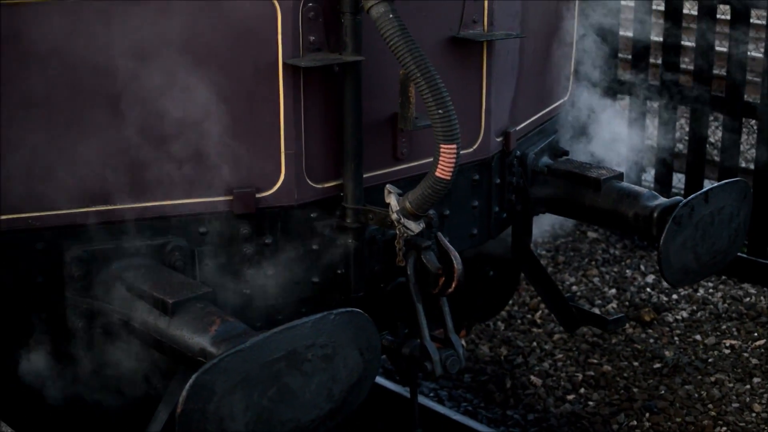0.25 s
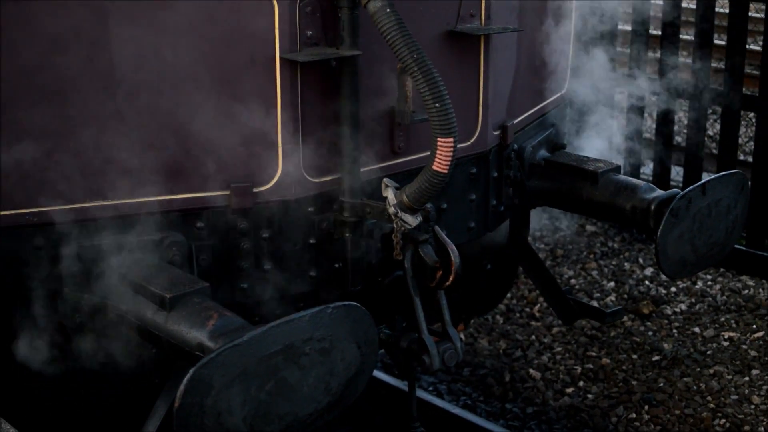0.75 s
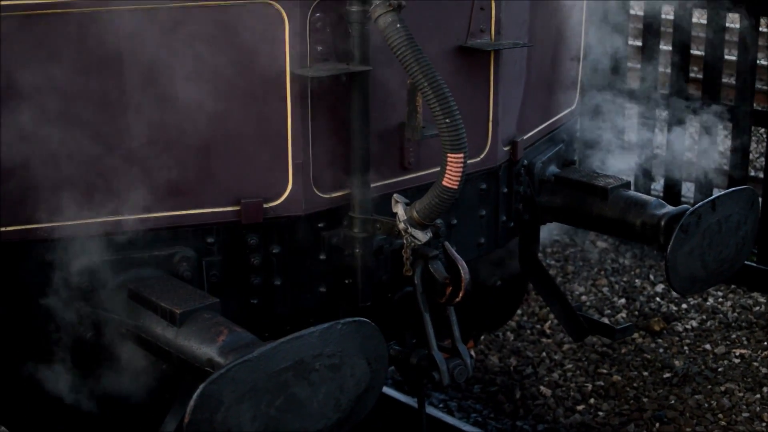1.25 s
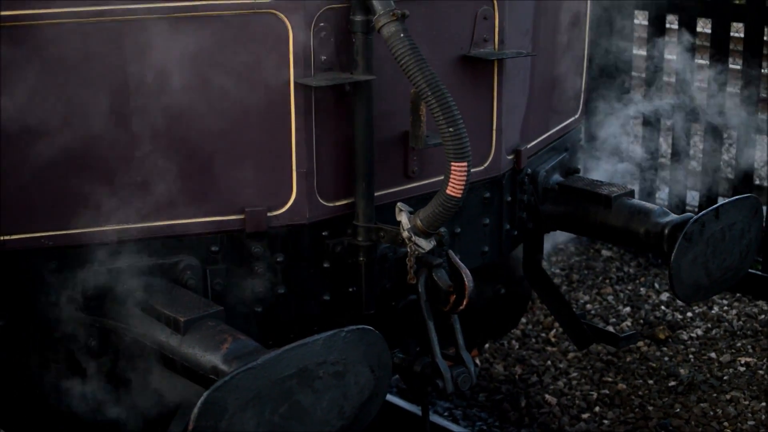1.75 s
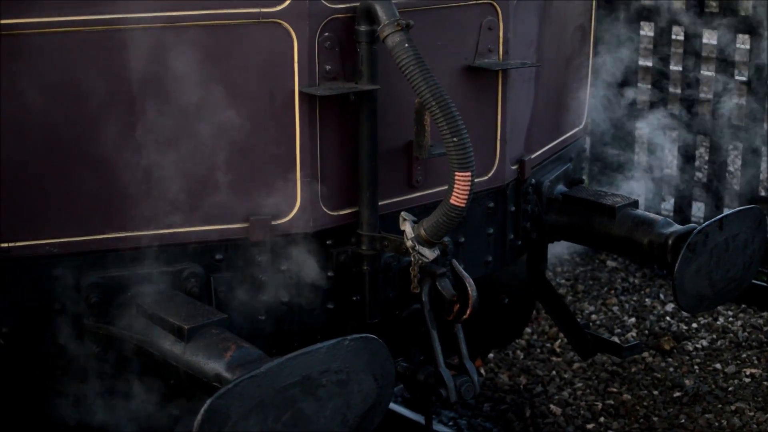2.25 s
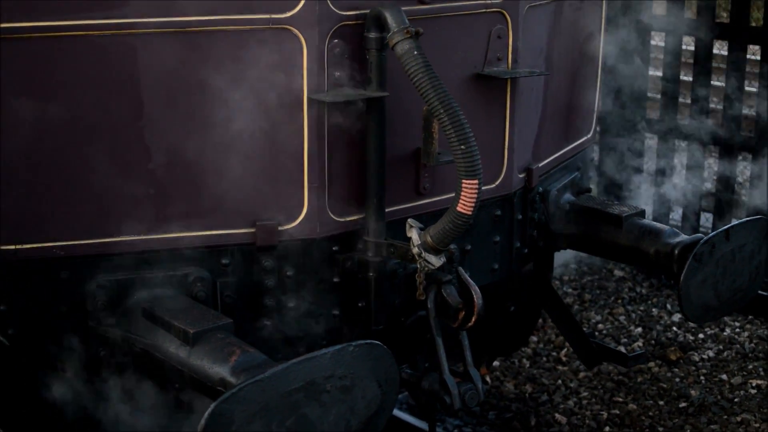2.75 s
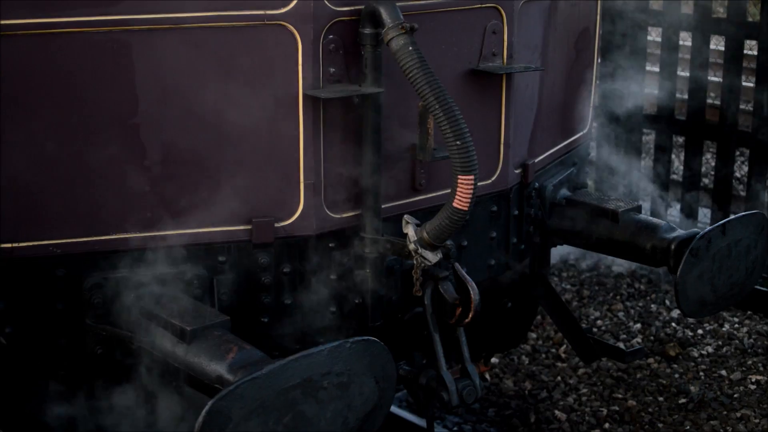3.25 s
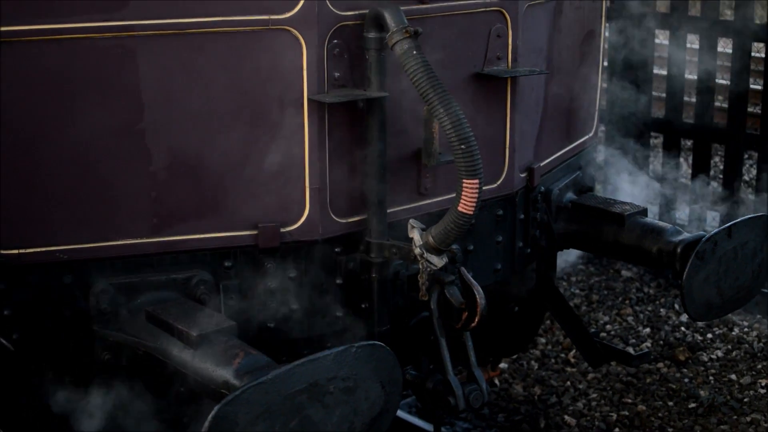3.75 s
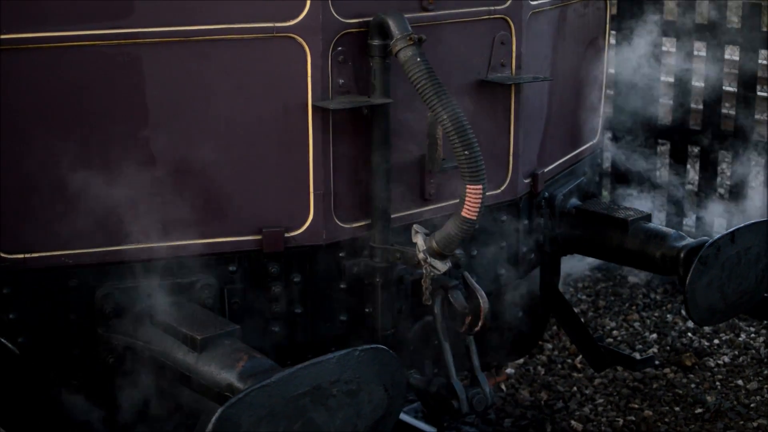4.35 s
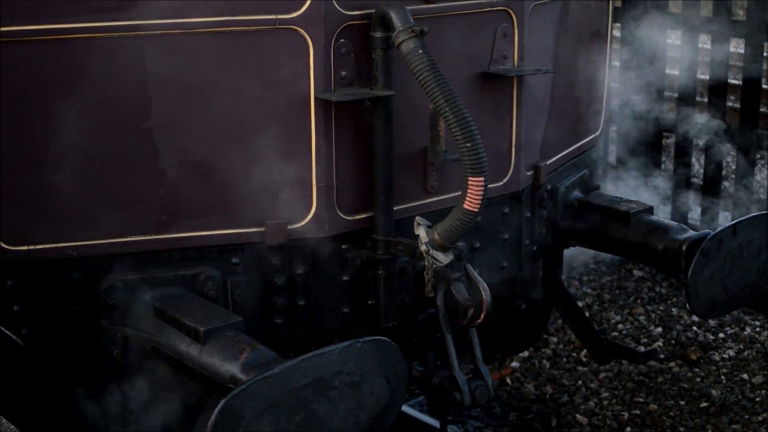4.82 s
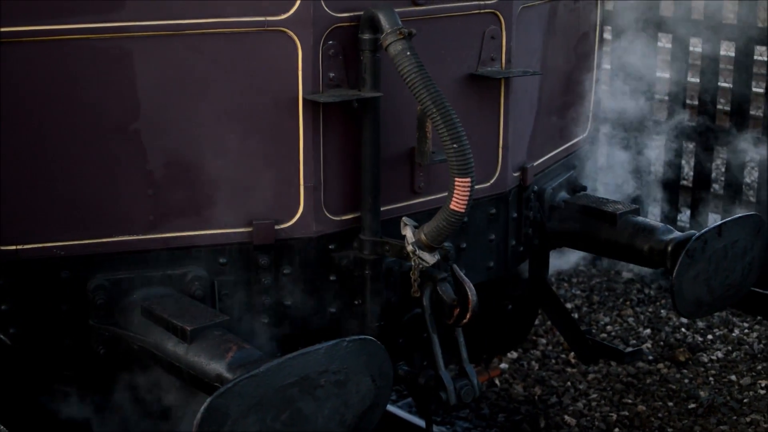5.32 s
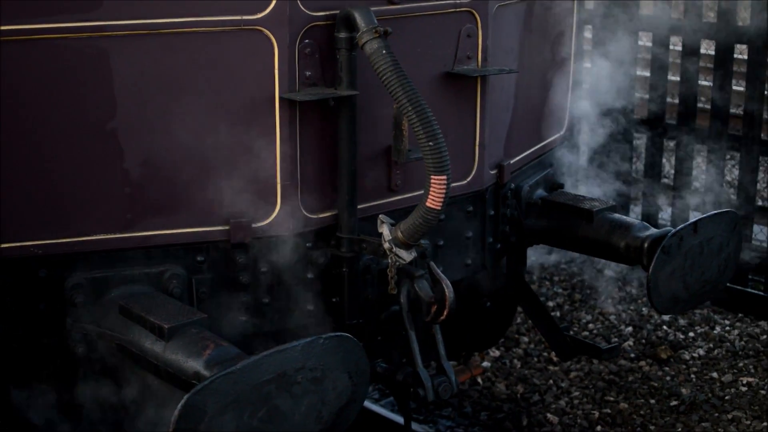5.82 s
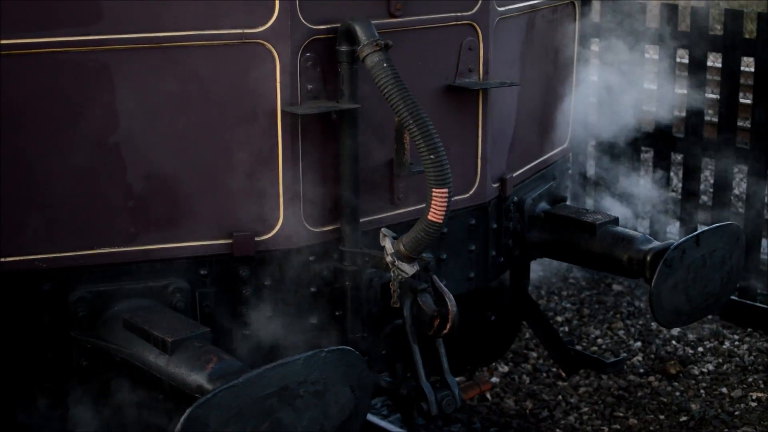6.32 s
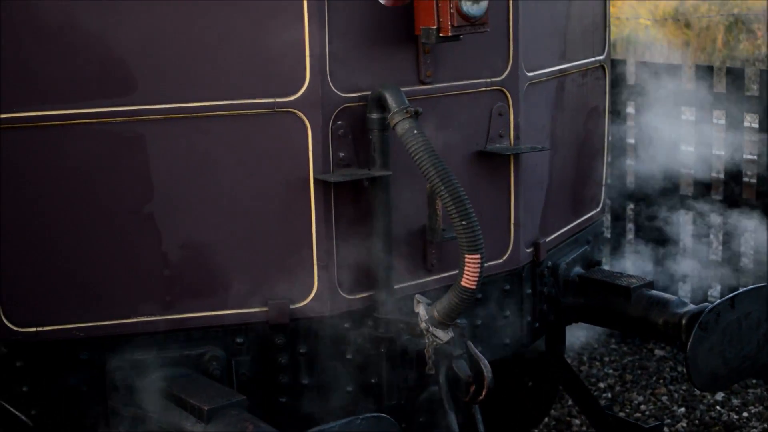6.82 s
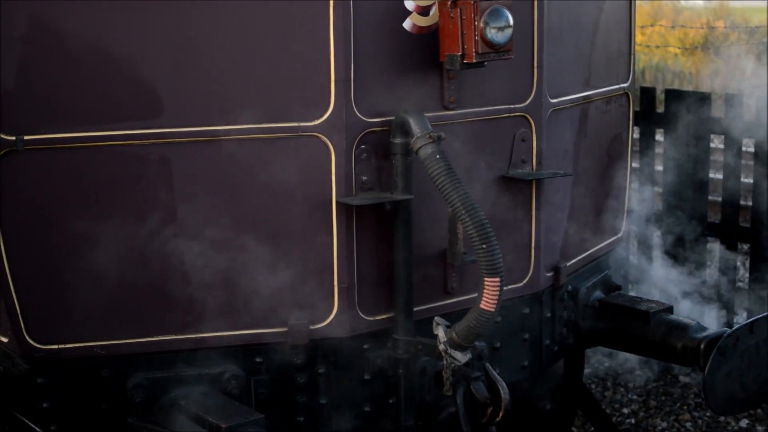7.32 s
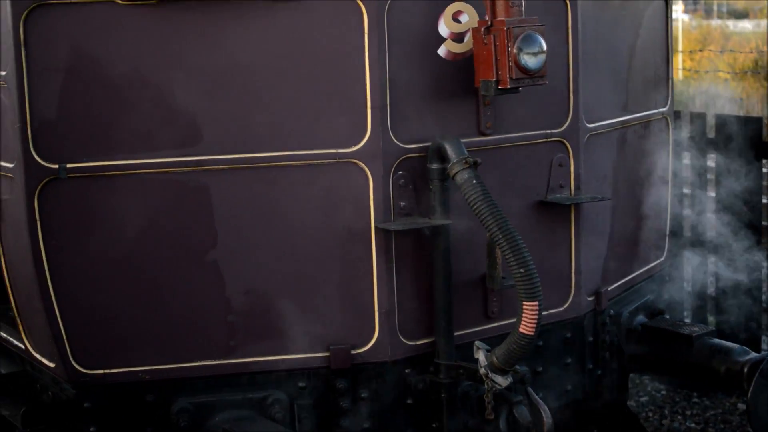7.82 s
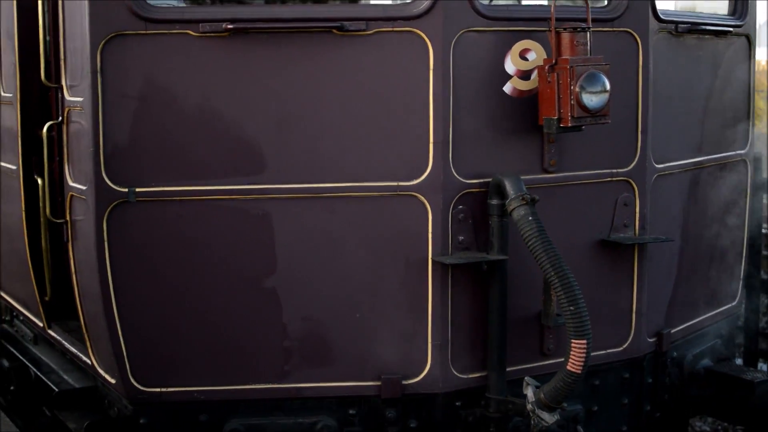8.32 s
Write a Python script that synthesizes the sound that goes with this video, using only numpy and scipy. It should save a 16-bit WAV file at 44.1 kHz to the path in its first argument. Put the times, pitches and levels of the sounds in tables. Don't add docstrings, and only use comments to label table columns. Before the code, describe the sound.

Outdoors, very close to a standing steam locomotive. From 0 s dense bright hiss pours from leaking joints over a low firebox rumble and a drone near 40 and 80 Hz that throbs once a second. Until 0.8 s wet steam spits in short bursts, strongest around 0.4-0.55, with a hollow pipe moan near 770 Hz. Then steady, slightly drifting hiss, with faint dull knocks near 2 and 3.2 s. At 3.45 a whistle stutters breathily, locks at about 3.64 into a strong tone rising from 750 to 800 Hz with a rush of steam, and stops at 4.05. The microphone overloads and its gain sinks; a beating ring near 790 Hz decays, with dull distant echoes around 5-5.7. The hiss recovers by about 4.6 and continues. Faint knocks come at 6.1-6.4; at 7.03 a strong puff, thump and small bright link clink. The rumble eases after 7.4, hiss lasting to 8.57.

```python
import sys
import numpy as np
from scipy import signal
from scipy.fft import rfft, dct
from scipy.io import wavfile
from scipy.ndimage import uniform_filter1d

SR = 44100
rng = np.random.default_rng(int(sys.argv[2]) if len(sys.argv) > 2 else 0)


def voltage_ratio(level):
    return 10 ** (np.asarray(level, float) / 20)


def file_out(sig):
    cols = np.atleast_2d(sig).T
    lim = np.clip(cols, -1, 1)
    pcm = np.round(lim * 32767).astype(np.int16)
    wavfile.write(sys.argv[1], SR, pcm)


N = 377937

# frequency in Hz, density in dB per Hz.
FIZZ_SPECTRUM = [(1470, -31.0), (2500, -12.0), (2870, -44), (2980, -7.0), (3420, -5.5), (3690, -1.5),
                 (4540, -5.0), (5890, -2.5), (7410, -4.0), (9620, -0.5), (11900, -6.5), (15600, -17),
                 (16500, -22)]
# frequency in Hz, density in dB per Hz.
BODY_SPECTRUM = [(260, -12), (450, -13.5), (659, -8), (759, -2.5), (1090, -7), (1550, 2), (1680, -1),
                 (2900, -6), (3770, -50), (6380, -120)]
# frequency in Hz, density in dB per Hz.
RUMBLE_SPECTRUM = [(18, -30), (30, -11.5), (59, 3.5), (81, 0), (92, -22), (108, -3), (173, -2.5),
                   (235, 1.5), (286, 8.5), (325, 0.5), (350, -8), (451, -3), (520, -11.5), (680, -13),
                   (1140, -120)]
# frequency in Hz, width in Hz, lift in dB.
PIPE_MODES = [(797, 20, 2.5), (1562, 295, -9.5), (2308, 43, 8.5), (2920, 91, -4.5), (3035, 63, 1.5),
              (3354, 320, -2.5), (3716, 110, -1), (4356, 87, 0.5), (4800, 75, 0.5), (5143, 150, 0),
              (6016, 100, 4), (6910, 250, -5)]
# frequency in Hz, width in Hz, level in dB over the rumble, fuzz share, throb share.
DRONE = [
    (39.6, 5.1, -7, 0.44, 1),
    (80.7, 1.7, -7.5, 0.34, 0.12),
]
# time in seconds, level in dB, brightness in dB per octave.
LEAK_DRIFT = [(0, -1, 3), (.8, 0.5, 1), (1.1, -0.1, 0.5), (1.7, 0, -0.5), (2.3, -0.6, -1.5),
              (2.85, 0.5, -1.5), (3.2, -0.4, 0.5), (4.4, 2, -1), (4.75, -0.9, -1.5), (5.2, -0.8, -1.5),
              (5.6, 0.3, -0.5), (6.2, .6, -1.9), (6.7, -1, 0), (7.3, 1, -1), (7.7, 0.5, 0.5), (8.1, 0.5, 0),
              (8.57, 0.4, 4.5)]
# start in seconds, flow in dB, hold in seconds.
LEAK_SURGES = [
    (0.637, 1, 0.046),
    (7.027, 6, 0.013),
]
# time in seconds, flow in dB over the leak.
VALVE_JET = [(3.44, -9), (3.468, -3), (3.48, 1.5), (3.495, 3), (3.51, 6), (3.536, 5.5), (3.555, 12.5),
             (3.572, 19.5), (3.596, 16), (3.62, 21), (3.642, 22), (3.652, 14.5), (3.7, 18.5), (3.8, 18),
             (3.9, 13), (4.03, 7.5), (4.1, -1)]
# frequency in Hz, density in dB per Hz.
JET_SPECTRUM = [(90, -12), (300, -14), (600, -3), (1500, -6), (2900, -0.5), (4000, -5), (6000, 0),
                (7800, -4.5), (9600, 2.5), (12000, -8), (16500, -18)]
# start in seconds, level in dB, hold in seconds, darkness from 0 to 1.
WET_SPITS = [(0, -19, 0.12, 0), (0.38, -15, .003, 0.01), (0.398, -15, 0.0066, 0),
             (0.427, -12.5, .004, 0.01), (0.458, -10.5, 0.086, 0), (0.563, -17, 0.063, 0.03),
             (0.647, -24, 0.032, 0), (0.688, -23, 0.0091, 0), (3.199, -25, .015, 0),
             (3.245, -21, 0.02, 0.1), (7.012, -20, .008, 0), (7.048, -28, 0.011, 0.4)]
# frequency in Hz, density in dB per Hz.
SPIT_SPECTRUM = [(250, -13), (560, -15.5), (700, -1.5), (1080, -8.5), (1200, -10), (1600, -9.5),
                 (1750, -15), (2780, -7), (2960, -2), (3100, -7), (3800, -12.5), (5000, -11), (7000, -21),
                 (10000, -7), (15600, -43)]
# frequency in Hz, density in dB per Hz.
THUD_SPECTRUM = [(30, 12), (120, -16), (220, 19), (400, 12), (900, -58), (3000, -60)]
# frequency in Hz, width in Hz, lift in dB.
COCK_MODES = [(760, 65, -9), (1030, 110, 10), (1440, 80, 12), (1580, 60, 0), (2100, 90, 3), (3040, 80, 1),
              (3330, 180, 9), (3700, 160, 2), (4330, 120, -2)]
# start in seconds, pitch in Hz, level in dB, 60 dB decay in seconds.
FRAME_KNOCKS = [(1.81, 198, -26, .25), (2.06, 126.5, -29.5, .25), (3.22, 253.5, -35, 0.22),
                (3.24, 356, -30.5, 0.3), (6.111, 362, -29, 0.21), (6.35, 221, -22.5, 0.28),
                (6.35, 145, -24, .2), (7.05, 107, -17, 0.087), (7.05, 394, -25, .12),
                (7.42, 328, -31.5, 0.22)]
# time in seconds, pitch in Hz, level in dB.
PIPE_MOAN = [(0, 790, -22), (.12, 770, -25), (.2, 790, -31), (.36, 778, -24.5), (.385, 760, -21),
             (.42, 770, -35), (.55, 765, -28), (.68, 757, -20), (.79, 750, -33)]
# time in seconds, pitch in Hz, level in dB.
WHISTLE_STUTTER = [(3.45, 741, -14), (3.484, 730, -24), (3.51, 816, -15), (3.556, 803, -5.5),
                   (3.566, 790, -4), (3.577, 795, 6), (3.588, 797, -4), (3.598, 777, 6), (3.608, 774, -17),
                   (3.622, 790, 5), (3.63, 760, -7)]
# time in seconds, level in dB.
WHISTLE_LOCKED = [(3.642, 16), (3.654, 13.5), (3.668, 10.5), (3.69, 17), (3.748, 15), (3.797, 18.5),
                  (3.861, 20.5), (3.93, 21.5), (3.962, 19.5), (3.995, 22), (4.015, 19), (4.04, 14.5),
                  (4.058, 4), (4.066, 9), (4.074, -1), (4.087, -27)]
# time in seconds, pitch in Hz, third partial in dB, second partial in dB.
WHISTLE_PRESSURE = [(3.575, 719, -28, -34), (3.587, 729, 5, -32), (3.603, 747, 8.5, -29),
                    (3.625, 760, 11, -27), (3.642, 752, 12, -25), (3.657, 757, 0, -24), (3.69, 771, 9, -9),
                    (3.73, 768.5, 3.5, -10), (3.79, 775.5, 2.5, -11), (3.86, 776.5, -0.5, -6),
                    (3.9, 786, -3, -1), (3.99, 803, -6.5, 2), (4.025, 808, -10, 0), (4.046, 770, -13, -8),
                    (4.056, 767, -40, -40), (4.08, 715, -60, -60)]
# multiple of the pitch, level in dB under partial 2.
UPPER_PARTIALS = [(4, -11), (5, -16), (6, -26), (7, -18), (8, -19), (9, -24)]
# delay in seconds, level in dB, slope in dB per second.
RING_PATHS = [
    (0.004, 11, -100),
    (0.22, -0.5, -72),
    (0.049, -22.5, -11.5),
    (0.725, -23, -110),
    (0.66, -19, -200),
]
RING_NULLS = [4.04, 4.085, 4.133, 4.168, 4.205, 4.238, 4.327, 4.368, 4.404, 4.44, 4.505, 4.56, 4.61, 4.65,
              4.675, 4.716, 4.76, 4.86, 4.935, 4.985]
# delay in seconds, level in dB.
HILL_RETURNS = [(.95, -62), (1.385, -44), (1.64, -54), (2.0, -72), (2.14, -57.5)]
# frequency in Hz, level in dB, 60 dB decay in seconds.
LINK_CLINK = (7.058, [(13400, -19, .13), (14200, -22, .05), (2450, -24, .07)])
# from seconds, to seconds, depth in dB.
GAIN_DUCKS = [
    (-.03, 0.22, 3.5),
    (0.385, 0.602, 5.5),
    (0.658, 0.819, 8),
    (3.526, 4.144, 29.5),
]
COARSE_ONCE = [.061, .978, 1.704, 1.855, 2.09, 2.493, 2.92, 2.963, 3.199, 3.326, 3.817, 3.86, 4.798, 4.862,
               5.033, 5.309, 5.695, 5.97, 6.121, 7.442, 7.764, 7.872, 8.104]
COARSE_TWICE = [.341, 3.43, 6.058, 7.507]
# time in seconds, difference in dB.
TREBLE_SPLIT = [(.412, -25), (1.225, -32), (1.297, -34), (1.6, -27), (2.11, -28), (4.995, -30),
                (5.155, -45), (5.22, -36), (5.64, -34), (7.15, -41), (8.54, -36)]


def evened(x):
    return x / np.sqrt(np.mean(x ** 2) + 1e-20)


def smoothed_noise(count, size):
    return evened(uniform_filter1d(rng.standard_normal(count), size=size))


def read(points, hz):
    f, value = np.transpose(points)
    return np.interp(np.log(hz + 1), np.log(f + 1), value, left=-90, right=-90)


def columns(rows):
    s, *values = np.transpose(rows)
    t = np.arange(N) / SR
    gate = np.clip(np.minimum(t - s[0], s[-1] - t) / 0.024, 0, 1)
    return [gate] + [np.interp(t, s, v) for v in values]


def burst(s, rise, hold, fall):
    t = np.arange(N) / SR
    return np.clip((t - s) / rise, 0, 1) * np.exp(-np.maximum(t - s - rise - hold, 0) / fall)


def resonate(x, hz, width):
    turn = np.exp(2j * np.pi * np.cumsum(hz * np.ones(len(x))) / SR)
    r = np.exp(-np.pi * width / SR)
    return 2 * (turn * signal.lfilter([1 - r], [1, -r], x / turn)).real


def noise(spectrum, modes, ring_db, patchy_db, flicker_db, comb_db=5.0, size=1024, tilt_db=np.zeros(1)):
    hop = size // 4
    frames, hz = N // hop + 5, np.fft.rfftfreq(size, 1 / SR)
    a, b, patches = rng.standard_normal((frames, len(hz), 3)).T
    patches = evened(uniform_filter1d(uniform_filter1d(patches, size=7, axis=0), size=14, axis=1))
    flicker = smoothed_noise(frames, 4)
    comb = comb_db * evened(uniform_filter1d(rng.standard_normal((frames, len(hz))), size=50, axis=0)).T
    rings = 0
    for f, width, db in modes:
        wander = 1 + 0.16 * evened(uniform_filter1d(patches[round(f * size / SR)], size=60))
        rings = rings + np.outer((ring_db + 0.46 * db) / (1 + (2 * (hz - f) / width) ** 2), wander)
    patches = patches * (1 + np.clip(hz / 9000 - 1, 0, 0.25))[:, None]
    tilt = np.interp(np.arange(frames) * hop, np.arange(len(tilt_db)), tilt_db)
    lean = np.log2((hz + 1) / 6500)[:, None] * tilt
    level_db = lean + read(spectrum, hz)[:, None] + rings + comb + patchy_db * patches + flicker_db * flicker
    return signal.istft((a + 1j * b) * voltage_ratio(level_db), nperseg=size, noverlap=size - hop)[1][:N]


def in_band(x, lo, hi):
    hz = np.fft.rfftfreq(N, 1 / SR)
    power = abs(rfft(x)[(hz > lo) & (hz < hi)]) ** 2
    return x * N / np.sqrt(2 * power.sum())


def firebox_drone():
    t = np.arange(N) / SR
    throb_db = 2 * np.cos(2 * np.pi * (t - 1.08))
    out = np.zeros(N)
    for hz, width, db, fuzz, share in DRONE:
        rough = evened(resonate(rng.standard_normal(N), hz, width))
        out += voltage_ratio(db + share * throb_db) * evened(np.sin(2 * np.pi * hz * t) + fuzz * rough)
    return out


def steam():
    t = np.arange(N) / SR
    fizz_db, body_db, rumble_db = -19, -33.5, -33.5
    surges = sum(voltage_ratio(db) * burst(s, 0.025, hold, 0.0063) for s, db, hold in LEAK_SURGES)
    flow = np.sqrt(1 + surges ** 2)

    gate, jet_db = columns(VALVE_JET)
    jet = noise(JET_SPECTRUM, [], 0, patchy_db=1.0, flicker_db=0.9, comb_db=2.0, size=512)
    jet = gate * voltage_ratio(fizz_db + jet_db) * in_band(jet, 5500, 15000)

    _, leak_db, bright_db = columns(LEAK_DRIFT)
    fizz = noise(FIZZ_SPECTRUM, PIPE_MODES, ring_db=6.0, patchy_db=1.8, flicker_db=0.5, comb_db=2.1,
                 tilt_db=bright_db)
    fizz = voltage_ratio(fizz_db + leak_db) * in_band(fizz, 5400, 15000)

    body_db = body_db - 0.29 * t
    body_db += 3.5 * np.exp(-(t / 0.38) ** 2)
    body_db -= 2.5 * np.exp(-((t - 1) / 0.25) ** 2)
    body = noise(BODY_SPECTRUM, PIPE_MODES, ring_db=-0.5, patchy_db=2.0, flicker_db=0.14, comb_db=2.5, size=2048)
    body = voltage_ratio(body_db) * in_band(body, 1145, 1467)

    rumble_db = rumble_db - 3.5 * np.clip((t - 7.4) / 0.16, 0, 1)
    rumble = noise(RUMBLE_SPECTRUM, [], 0, patchy_db=1.0, flicker_db=-0.5, comb_db=2.5, size=4096)
    rumble = in_band(rumble, 100, 450)
    return jet + flow * (fizz + body) + voltage_ratio(rumble_db) * (flow ** 0.25 * rumble + firebox_drone())


def spits():
    bright = evened(noise(SPIT_SPECTRUM, COCK_MODES, ring_db=9.0, patchy_db=0, flicker_db=0, comb_db=1.5))
    dull = evened(noise(THUD_SPECTRUM, [], 0, patchy_db=0, flicker_db=0))
    out = np.zeros(N)
    for s, db, hold, dark in WET_SPITS:
        shape = burst(s, 0.0045, hold, 0.011 + 0.076 * dark)
        out += voltage_ratio(db) * shape * (np.sqrt(1 - dark) * bright + np.sqrt(dark) * dull)
    t = np.arange(N) / SR
    for s, hz, db, t60 in FRAME_KNOCKS:
        out += voltage_ratio(db) * burst(s, 0.0065, 0, t60 / np.log(1000)) * np.sin(2 * np.pi * hz * (t - s))
    return out


def moan():
    gate, hz, db = columns(PIPE_MOAN)
    return gate * voltage_ratio(db) * evened(resonate(resonate(rng.standard_normal(N), hz, 120), hz, 120))


def whistle():
    t = np.arange(N) / SR
    lock_s, jump_s = 3.545, 3.61
    upper_gate, pipe_hz, third_db, second_db = columns(WHISTLE_PRESSURE)
    gate, db = columns([(s, db) for s, _, db in WHISTLE_STUTTER] + WHISTLE_LOCKED)
    hz = np.where(t < WHISTLE_STUTTER[-1][0], columns(WHISTLE_STUTTER)[1], pipe_hz)
    breath = 0.018 + 0.19 * (t < jump_s) + 0.67 * (t < lock_s)
    db = db + 0.4 * np.cos(2 * np.pi * 9.6 * (t - 3.995)) * (t > jump_s)
    fuzz = evened(resonate(rng.standard_normal(N), hz, 170))
    tone = np.sqrt(2 - 2 * breath ** 2) * np.sin(2 * np.pi * np.cumsum(hz) / SR)
    out = gate * voltage_ratio(db) * (tone + breath * fuzz)

    mixed_db = np.minimum(third_db, 8) - 20 * np.clip((WHISTLE_LOCKED[0][0] - t) / 0.02, 0, 1)
    partials = [(2.998, third_db), (4, mixed_db - 14.5), (7, mixed_db - 17), (2, second_db)]
    partials += [(k, second_db + under_db) for k, under_db in UPPER_PARTIALS]
    phase = 2 * np.pi * np.cumsum(pipe_hz) / SR
    for k, partial_db in partials:
        flutter = voltage_ratio(0.55 * k * smoothed_noise(N, 400))
        out += upper_gate * voltage_ratio(partial_db) * np.sqrt(2) * flutter * np.sin(k * phase)
    return out


def ring():
    t = np.arange(N) / SR
    age = np.maximum(t - 4.04, 0)
    hz = 790 + 23.89 * np.exp(-age / 0.12)
    power = np.zeros(N)
    for s, db, db_per_s in RING_PATHS:
        power += (np.clip((age - s) / 0.05, 0, 1) * voltage_ratio(db + db_per_s * (age - s))) ** 2
    phase = 2 * np.pi * np.cumsum(hz) / SR
    later = RING_NULLS[-1] + 0.1 * np.cumsum(rng.uniform(0.5, 1.5, size=60))
    nulls = np.append(RING_NULLS, later)
    beat = np.sin(np.pi * np.interp(t, nulls, np.arange(len(nulls))))
    beat = np.sign(beat) * abs(beat) ** 0.64
    smear = [evened(resonate(resonate(rng.standard_normal(N), k * hz, 30), k * hz, 30)) for k in range(1, 5)]
    shallow = (t > 4.125) & (t < 4.225)
    fill = 0.2 + 0.7 * uniform_filter1d(shallow * 1.0, size=900)
    late = np.clip((t - RING_NULLS[1]) / 0.01 + 0.5, 0, 1)
    lowest = 1.7 * beat * np.sin(phase) + fill * np.cos(phase) + 0.12 * smear[0]
    upper = voltage_ratio(-19) * smear[1] + voltage_ratio(-22) * smear[2] + voltage_ratio(-30) * smear[3]
    return np.sqrt(power) * (late * lowest + upper)


def echo(blast):
    dull = resonate(blast, 790, 263.5)
    waver = 1 + 0.14 * smoothed_noise(N, 1200)
    return waver * sum(voltage_ratio(db) * np.pad(dull, (round(s * SR), 0))[:N] for s, db in HILL_RETURNS)


def clink():
    s, modes = LINK_CLINK
    t = np.maximum(np.arange(N) / SR - s, 0)
    return sum(voltage_ratio(db - 60 * t / t60) * np.sin(2 * np.pi * hz * t) for hz, db, t60 in modes)


def scene():
    blast = whistle() + ring()
    mix = steam() + spits() + moan() + blast + echo(blast) + clink()
    return np.tile(mix, (2, 1))


def gain_control():
    t, cut_db = np.arange(N) / SR, np.zeros(N)
    for start, stop, db in GAIN_DUCKS:
        sunk = db * (1 - np.exp(-(np.clip(t, start, stop) - start) / 0.11))
        back = uniform_filter1d(61 * np.maximum(t - stop, 0), size=round(0.063 * SR))
        cut_db += sunk - np.minimum(back, sunk)
    return voltage_ratio(-uniform_filter1d(cut_db, size=900))


def coarsen(x):
    out, size = x.copy(), 1882
    window = np.hanning(size)
    _, _, blast_from, blast_to = 0, 0, *GAIN_DUCKS[-1][:2]
    moments = [(s, 8.5 - 3.5 * (blast_from < s < blast_to)) for s in COARSE_ONCE]
    moments += [(s + k * 1024 / 48000, 10.5) for s in COARSE_TWICE for k in range(2)]
    for s, db in moments:
        part = slice(round(s * SR) - size // 2, round(s * SR) + size // 2)
        lines = dct(x[part] * np.sqrt(window), type=4, norm="ortho")
        local = uniform_filter1d(lines ** 2, size=60) + 1e-12
        step = voltage_ratio(db + 1) * local ** 0.31 * np.median(local[:1300]) ** 0.19
        coarse = np.round(lines / step) * step
        coarse *= min(np.linalg.norm(lines) / (np.linalg.norm(coarse) + 1e-9), 1.8)
        out[part] += dct(coarse, type=4, norm="ortho") * np.sqrt(window) - x[part] * window
    return out


def top_cut(x):
    return signal.sosfilt(signal.butter(12, 15730, fs=SR, output="sos"), x)


def record(dry):
    mono = coarsen(np.clip(dry[0] * gain_control(), -0.98, 0.98))
    t = np.arange(N) / SR
    band = signal.butter(8, [4300, 15500], "band", fs=SR, output="sos")
    treble = evened(signal.sosfilt(band, mono[::-1]))
    side = treble * sum(voltage_ratio(db) * np.exp(-((t - s) / 0.012) ** 4) for s, db in TREBLE_SPLIT)
    return top_cut(np.array([mono + side, mono - side]))


dry = scene()
out = record(dry)
file_out(out)
```